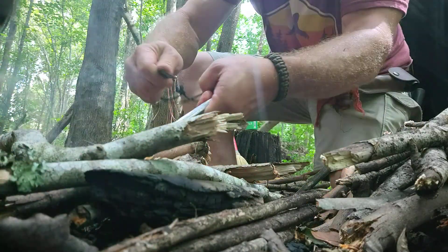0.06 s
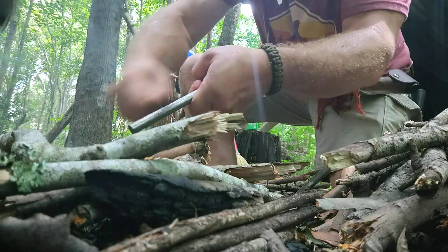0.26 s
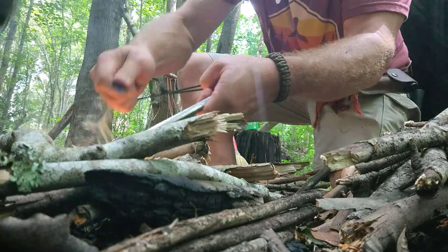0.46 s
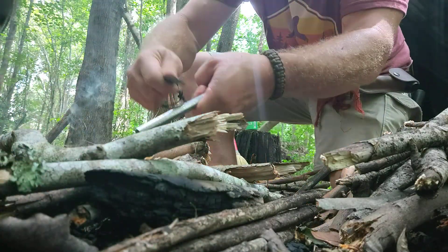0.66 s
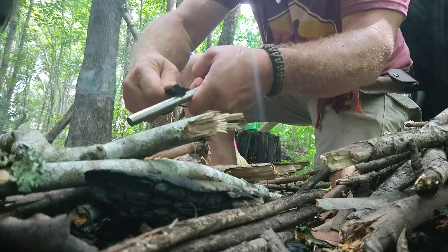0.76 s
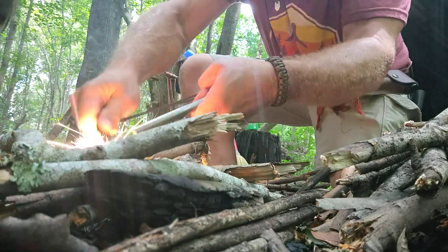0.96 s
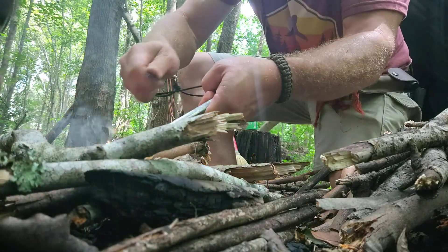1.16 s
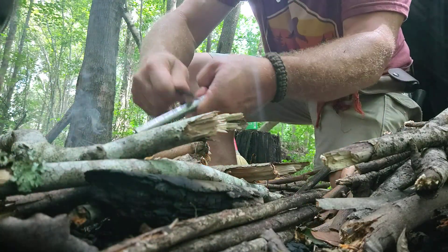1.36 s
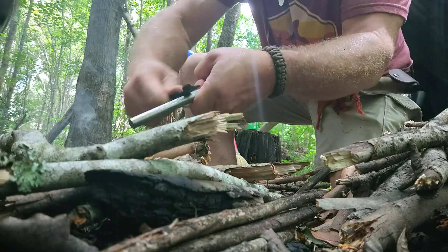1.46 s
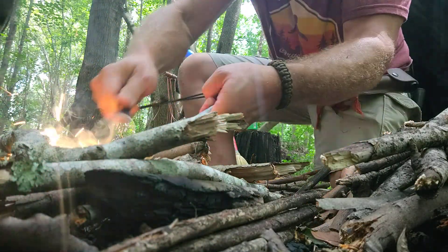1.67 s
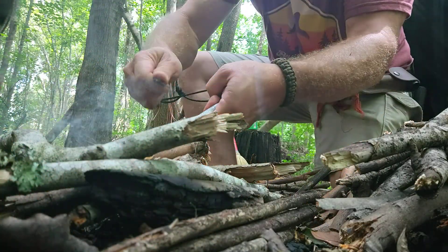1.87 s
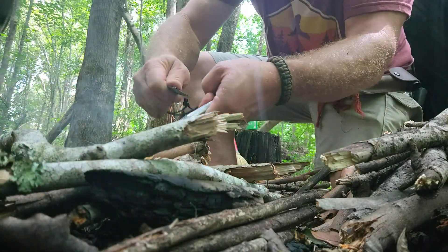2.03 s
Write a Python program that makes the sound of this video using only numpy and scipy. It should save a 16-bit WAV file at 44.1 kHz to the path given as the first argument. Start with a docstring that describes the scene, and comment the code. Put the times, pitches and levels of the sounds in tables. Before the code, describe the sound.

A knife scrapes a fire-starting rod three times, with bright rasps and sputtering sparks.

```python
"""The back of a knife scrapes hard down a fire-starting rod three times, close by, in a wood.
Each stroke is a metal tap as the blade lands, a bright rasp as it tears off grit, and the sputter
of burning shavings. The edge snags and squeaks on the way, and stray sparks pop afterwards.
Far off, birds whistle, insects shrill and a low hum drones."""
import sys
import numpy as np
from scipy import signal
from scipy.fft import rfft, irfft, next_fast_len
from scipy.io import wavfile

SR = 44100
rng = np.random.default_rng(int(sys.argv[2]) if len(sys.argv) > 2 else 0)


def store_wav(level_fs):
    """Save 16-bit WAV to argv[1]."""
    pcm = np.round(np.clip(np.atleast_2d(level_fs), -1, 1) * 32767)
    wavfile.write(sys.argv[1], SR, pcm.T.astype(np.int16))


N = 92610
TIME = np.arange(N) / SR
PADDED = next_fast_len(N + SR // 4, True)   # spare room for filters to ring out
HZ = np.arange(PADDED // 2 + 1) * SR / PADDED
BASS_HZ = 690   # below this, left and right move nearly in step


def from_db(db):
    """Turn decibels into a number to multiply by."""
    return 10 ** (np.asarray(db) / 20)


def unit_power(x):
    """Scale a signal to an average power of 1."""
    return x / np.sqrt(np.mean(x ** 2) + 1e-20)


def curve(points):
    """Join (frequency, value) points into a line over all pitches."""
    hz, value = np.transpose(points)
    return np.interp(np.log(HZ + 1), np.log(hz), value)


def colour(x, gain):
    """Turn each frequency up or down, with no ringing ahead of a click (minimum phase)."""
    cepstrum = irfft(np.log(gain + 1e-9), PADDED)
    cepstrum[1:PADDED // 2] *= 2
    cepstrum[PADDED // 2 + 1:] = 0
    return irfft(rfft(x, PADDED) * np.exp(rfft(cepstrum)), PADDED)[..., :N]


def shaped(x, tone):
    """Give plain noise or clicks a tone colour, keeping their power."""
    return colour(x, unit_power(from_db(curve(tone))))


def passed(x, hz, kind):
    """Keep the "low" or the "high" side of a frequency."""
    return signal.sosfilt(signal.butter(2, hz, kind, fs=SR, output="sos"), x)


def drift(rate_hz):
    """A smooth random wobble, about 1 in size."""
    smoothed = rfft(rng.standard_normal(PADDED)) / (1 + (HZ / rate_hz) ** 2)
    return unit_power(irfft(smoothed, PADDED)[:N])


def wavering_tone(hz, width_hz):
    """A tone whose strength and pitch wander."""
    phase = 2 * np.pi * hz * TIME
    return drift(width_hz) * np.sin(phase) + drift(width_hz) * np.cos(phase)


def ring(x, hz, fade_s):
    """One note of struck metal, dying away by 60 dB in fade_s."""
    keep = from_db(-60 / (fade_s * SR))
    step = 2 * np.pi * hz / SR
    return signal.lfilter([0, np.sin(step)], [1, -2 * keep * np.cos(step), keep * keep], x + 1e-18)


def grains(per_s, spread_db):
    """Tiny random cracks, a few much louder than the rest."""
    sizes = from_db(spread_db * np.minimum(rng.exponential(1, N), 4.5))
    signs = rng.choice([-1, 1], N)
    happens = rng.random(N) < per_s / SR
    return unit_power(sizes * signs * happens)


def snap(start, db, decay_s, tail_db, per_s):
    """A sharp click, then a fading crackle of tiny contacts."""
    fade = (TIME >= start) * np.exp(-np.abs(TIME - start) / decay_s)
    sound = from_db(tail_db) * fade * grains(per_s, spread_db=2.5)
    sound[int(start * SR)] = 1
    return from_db(db) * sound


def echoes(x, fade_s):
    """A wash of reflections, different left and right, dying away by 60 dB in fade_s."""
    t = TIME[:SR]
    build_up = 1 - np.exp(-t / (0.063 * fade_s))
    tail = rng.standard_normal((2, SR)) * from_db(-60 * t / fade_s) * build_up
    tail /= np.sqrt(np.sum(tail ** 2, axis=1, keepdims=True))
    return signal.fftconvolve(np.atleast_2d(x), tail, axes=1)[:, :N]


def wide(make_noise, apart):
    """Spread a noise out: above the bass, the share `apart` of its power differs left and right."""
    share = apart * (1 - 1 / (1 + (HZ / BASS_HZ) ** 4))
    common, left, right = rfft([make_noise(), make_noise(), make_noise()], PADDED)
    return irfft(np.sqrt(1 - share) * common + np.sqrt(share) * np.array([left, right]), PADDED)[:, :N]


# How much louder the left side is than the right: f/Hz, level/dB
LEFT_OVER_RIGHT = [(380, 1), (720, -9.5), (1200, 12), (2000, -6.5), (2600, 3.5), (3100, 5.5), (3700, 2.5),
                   (4700, 8.5), (5700, 3.5), (7000, 7), (8000, -4), (9000, -5), (11000, -19), (12200, -15),
                   (14300, -10.5), (15500, -20)]
def microphone(pair, right_lag_s=0.000325):
    """Each side has its own tone colour, and above the bass the right hears a little late."""
    lag = right_lag_s * (1 - 1 / (1 + (HZ / BASS_HZ) ** 8))
    right = irfft(rfft(pair[1], PADDED) * np.exp(-2j * np.pi * HZ * lag), PADDED)
    ratio = from_db(curve(LEFT_OVER_RIGHT))
    right_gain = np.sqrt(2 / (1 + ratio ** 2))
    return np.array([colour(pair[0], ratio * right_gain), colour(right, right_gain)])


# Tone colour of still air: f/Hz, level/dB
AIR_TONE = [(20, -43), (50, -3), (140, 5), (300, -4), (600, -4), (1400, -10.5), (1850, -10), (2400, -12.5),
            (4300, -15.5), (7000, -17.5), (9400, -19.5), (11000, -10.5), (15700, -20)]
def air(level_db=-61.5):
    """Still air makes a faint, even hiss."""
    hiss = wide(lambda: rng.standard_normal(N), apart=0.73)
    return from_db(level_db) * microphone(shaped(hiss, AIR_TONE))


# Notes of the far hum: f/Hz, level/dB
HUM_NOTES = [(80, -72), (118, -64.5), (134, -65.5), (161, -63), (235, -70.5)]
def hum(waver=0.39):
    """Low notes drone far away, each wavering a little."""
    sound = 0
    for hz, db in HUM_NOTES:
        steady = np.sin(2 * np.pi * (hz * TIME + rng.random()))
        sound += from_db(db) * (steady + waver * wavering_tone(hz, width_hz=8))
    return sound


# Tone colour of the insects: f/Hz, level/dB
INSECT_TONE = [(5500, -94), (7100, -18), (7650, -7.5), (8050, 2), (8350, -15.5), (8900, -19), (11000, -36)]
def insects(level_db=-62, flicker_db=2.4):
    """Insects blend into one high, shrill band whose level flickers."""
    loudness = from_db(level_db - flicker_db * drift(rate_hz=37))
    return loudness * shaped(rng.standard_normal((2, N)), INSECT_TONE)


# Bird whistles: t/s, length/s, start f/Hz, middle f/Hz, end f/Hz, level/dB, change to the direct part/dB
BIRD_NOTES = [(0.371, 0.091, 1832, 2020, 2213, -59, -3), (0.48, 0.085, 2335, 2310, 2272, -64, -2),
              (0.626, 0.048, 3620, 3330, 2900, -57, -9), (0.745, 0.11, 1600, 1670, 1850, -69, -3),
              (1.071, .05, 3850, 3350, 2850, -57, -9), (1.368, 0.088, 1700, 1990, 1940, -66.5, -1),
              (1.828, 0.04, 3200, 2900, 2450, -62, -6)]
def birds(echo_db=0.5):
    """Far birds whistle sliding notes, blurred by echoes from the trees."""
    song, direct = np.zeros(N), np.zeros(N)
    for start, length, start_hz, middle_hz, end_hz, db, direct_db in BIRD_NOTES:
        along = np.clip((TIME - start) / length, 0, 1)
        arc = np.polyfit([0, .5, 1], [start_hz, middle_hz, end_hz], 2)
        pitch = np.polyval(arc, along)
        swell = np.sqrt(2 * np.abs(np.sin(np.pi * along)))
        note = from_db(db) * swell * np.sin(2 * np.pi * np.cumsum(pitch) / SR)
        song += note
        direct += from_db(direct_db) * note
    return direct + from_db(echo_db) * echoes(song, fade_s=0.39)


# Stray sparks: t/s, level/dB, decay/s
SPARK_POPS = [(0.378, -23, 0.0017), (0.389, -32, 0.0013), (.4175, -34, 0.0014), (.495, -25, 0.00082),
              (0.5282, -36, .001), (0.5798, -33.5, 0.0059), (1.029, -26, 0.011), (1.081, -25.5, 0.0029),
              (1.139, -30.5, 0.0088), (1.304, -34.5, .004), (1.852, -35, 0.011), (2.003, -33, 0.0023)]
def pops():
    """Single shavings flare up with a dry crack, a duller form of the sputter in scrapes()."""
    cracks = sum(snap(*row, tail_db=-15, per_s=1500) for row in SPARK_POPS)
    return passed(shaped(cracks, SPUTTER_TONE), 4000, "low")


# Squeaks of the edge: t/s, length/s, f/Hz, level/dB
EDGE_SQUEAKS = [(0.202, 0.034, 2455, -53), (0.233, 0.0076, 6800, -34.5), (0.32, 0.021, 2400, -33),
                (0.928, 0.09, 2500, -53.5), (1.729, 0.016, 2400, -41), (1.752, 0.061, 2545, -52),
                (1.848, 0.016, 2515, -51.5)]
def squeaks(roughness=0.092):
    """The edge sticks and slips, making short, rough tones."""
    sound = 0
    for start, length, hz, db in EDGE_SQUEAKS:
        along = np.clip((TIME - start) / length, 0, 1)
        swell = np.sqrt(np.abs(np.sin(np.pi * along)))
        sound += from_db(db) * swell * wavering_tone(hz, width_hz=roughness * hz)
    return sound


# Moments when the edge snags: t/s, level/dB, decay/s
EDGE_SNAGS = [(0.273, -25, 0.0018), (.2915, -5, 0.00093), (.3058, -2, 0.00089), (0.3447, -0.5, 0.003),
              (0.8876, -7.5, 0.00091), (1.0482, -26.5, 0.00094), (1.484, -7.5, 0.00088),
              (1.6578, -18.5, 0.0011), (1.7335, -25, 0.0007), (1.741, -17, 0.0013), (1.7791, -14, 0.00062)]
# Tone colour of a snag: f/Hz, level/dB
SNAG_TONE = [(300, -23), (1100, -6), (2600, -12), (3200, -21), (4200, 1), (6200, -11.5), (8500, -6.5),
             (10800, 9), (12700, 2.5), (14200, 6), (15700, -35)]
def snags():
    """The edge catches on the rod and breaks free with a bright snap."""
    snaps = sum(snap(*row, tail_db=-14, per_s=9000) for row in EDGE_SNAGS)
    return shaped(snaps, SNAG_TONE)


# The blade lands: t/s, level/dB, treble change/dB, clatter decay/s, rod's lowest note f/Hz, its level/dB
BLADE_TAPS = [(0.1505, -8, 2, 0.0024, 2100, -6), (0.675, -13, -10, 0.0019, 1690, -13),
              (1.3463, -14, -8, 0.0014, 1630, -11)]
# Notes of blade and rod, muffled by the hands: f/Hz, level/dB, time to fade by 60 dB/s
METAL_NOTES = [(723, -19, 0.017), (3460, -9.5, 0.0079), (3680, -9.5, 0.0088), (4630, -9, 0.0074),
               (5500, -1.5, 0.0094), (6370, -2.5, 0.0086), (7910, -8.5, 0.0051), (8700, -2.5, 0.0055),
               (9980, -6, 0.008), (10780, 0.5, 0.0073), (12360, 7, 0.0046), (14100, -12, 0.0084)]
def taps(ring_db=-10, crack_db=-4, rod_fade_s=0.015, treble_hz=9850, treble_span_hz=3000):
    """Steel clicks onto the rod and both ring briefly; the rod's lowest note shifts with the grip."""
    sound = np.zeros(N)
    for start, db, treble_db, clatter_s, rod_hz, rod_db in BLADE_TAPS:
        contact = snap(start, db, clatter_s, tail_db=-20, per_s=12000)
        sound += from_db(crack_db) * passed(contact, treble_hz, "high")
        notes = sorted(METAL_NOTES + [(rod_hz, rod_db, rod_fade_s)])
        for k, (hz, note_db, fade_s) in enumerate(notes):
            treble_share = np.clip((hz - treble_hz) / treble_span_hz, 0, 1)
            gain = from_db(ring_db + note_db + treble_share * treble_db)
            sound += (-1) ** k * gain * ring(contact, hz, fade_s)   # neighbours swing opposite ways
    return sound


# Loudness along each stroke, one list per stroke: t/s, rasp level/dB, sputter level/dB
STROKE_LEVELS = [
    [(0, -68, -58), (.148, -66.5, -59), (.156, -57, -49), (.18, -34.5, -51), (.195, -43.5, -60.5),
     (.218, -38, -55), (.24, -27, -57), (.272, -28.5, -47), (.278, -22, -37), (.292, -24, -31.5),
     (.315, -24, -33), (.338, -32, -35.5), (.356, -27, -41), (.365, -36.5, -39.5), (.41, -53, -54),
     (.455, -75, -65), (.478, -53, -54.5), (.54, -83, -62.5)],
    [(.836, -53, -80), (.843, -35.5, -81), (.875, -40.5, -70), (.888, -28, -42), (.916, -25, -35.5),
     (.925, -31, -36.5), (.95, -28.5, -39), (.98, -36, -40), (1.01, -43.5, -50.5), (1.065, -59, -59.5),
     (1.1, -52, -50.5), (1.125, -70, -67), (1.18, -66, -72)],
    [(1.449, -53, -82.5), (1.458, -37.5, -72), (1.48, -35.5, -57), (1.497, -25, -43.5), (1.524, -28, -29),
     (1.545, -33, -36.5), (1.57, -35.5, -41.5), (1.59, -39, -44.5), (1.64, -49.5, -48.5),
     (1.665, -49.5, -45), (1.72, -50.5, -52), (1.74, -34, -42.5), (1.758, -52.5, -50.5),
     (1.785, -43.5, -51), (1.825, -71, -67)],
]
# Tone colour of the burning shavings: f/Hz, level/dB
SPUTTER_TONE = [(40, -44), (110, -3.5), (260, -3.5), (400, 1.5), (620, 0), (790, 1), (950, 0), (1500, -0.5),
                (1830, -0.5), (2150, -0.5), (2700, -3), (3100, -18), (3450, -16), (3700, -4), (4100, -10.5),
                (5400, -8.5), (6200, -13.5), (9000, -8.5), (16000, -29)]
# Tone colour of steel tearing the rod: f/Hz, level/dB
RASP_TONE = [(1500, -29), (3200, -24.5), (4700, -13), (5400, -14), (5700, -11), (6300, -6), (7500, -20.5),
             (8900, -8), (9500, -11), (9900, -3), (10400, 0), (11000, 2.5), (11600, -1.5), (12200, -6),
             (12700, -1.5), (13800, -5.5), (15700, -11.5)]
def scrapes(rasp_trim_db=-0.5, chatter_db=1.5):
    """The edge tears grit off the rod with an uneven bite; the shavings catch fire and sputter."""
    rasp_gain, sputter_gain = 0, 0
    for stroke in STROKE_LEVELS:
        times, rasp_db, sputter_db = np.transpose(stroke)
        rasp_gain += from_db(np.interp(TIME, times, rasp_db, -np.inf, -np.inf) + rasp_trim_db)
        sputter_gain += from_db(np.interp(TIME, times, sputter_db, -np.inf, -np.inf))
    bite = from_db(chatter_db * drift(rate_hz=290))
    grit = wide(lambda: grains(per_s=5000, spread_db=3), apart=0.98)
    sparks = wide(lambda: grains(per_s=3800, spread_db=4.5), apart=0.48)
    return shaped(rasp_gain * bite * grit, RASP_TONE) + shaped(sputter_gain * bite * sparks, SPUTTER_TONE)


def scene():
    """Knife and rod close by, quick echoes off the hands and a woodpile, and the wood all around."""
    tap = taps()
    steel = scrapes() + tap + snags() + squeaks() + pops()
    near_echo = from_db(-4) * echoes(passed(steel, 1600, "high"), fade_s=0.021)
    tree_echo = from_db(-38) * echoes(steel, fade_s=0.39)
    tap_echo = from_db(-14) * echoes(passed(tap, 8900, "low"), fade_s=0.15)
    return microphone(steel + near_echo) + tree_echo + tap_echo + birds() + air() + insects() + hum()


def record(dry):
    """Cut the very highest treble off steeply."""
    return signal.sosfilt(signal.ellip(12, .2, 70, 15750, fs=SR, output="sos"), dry)


dry = scene()
out = record(dry)
store_wav(out)
```